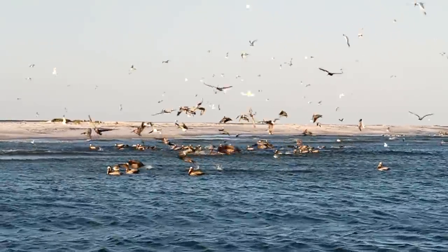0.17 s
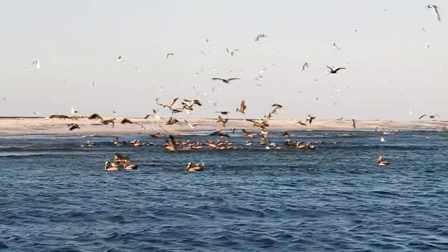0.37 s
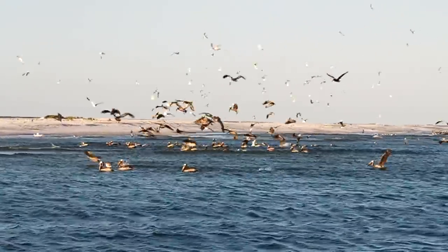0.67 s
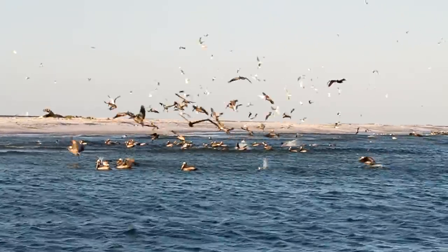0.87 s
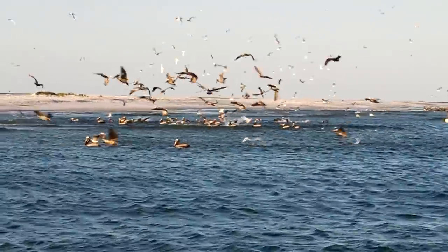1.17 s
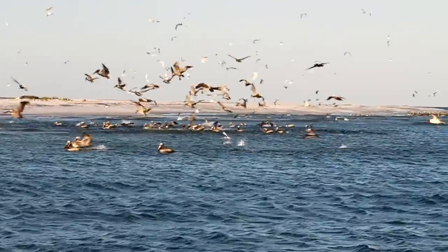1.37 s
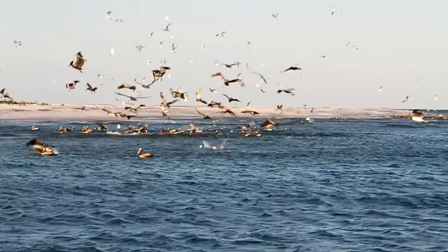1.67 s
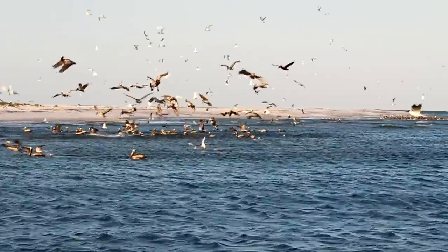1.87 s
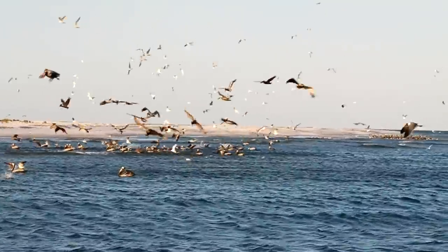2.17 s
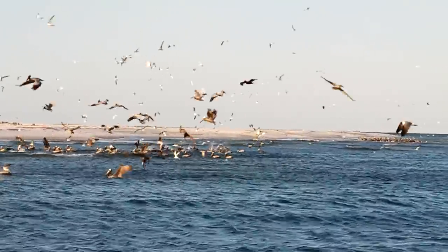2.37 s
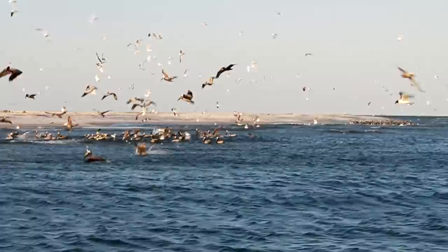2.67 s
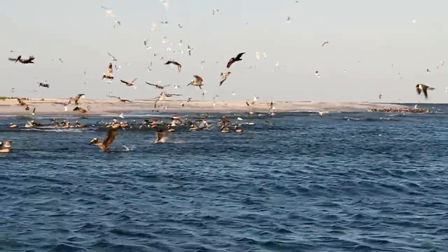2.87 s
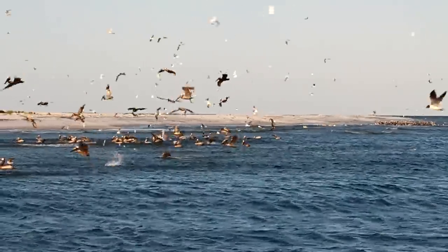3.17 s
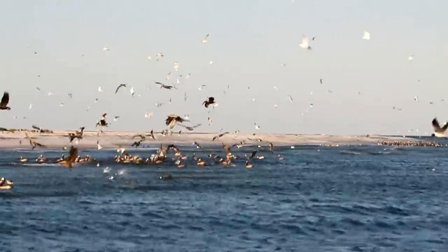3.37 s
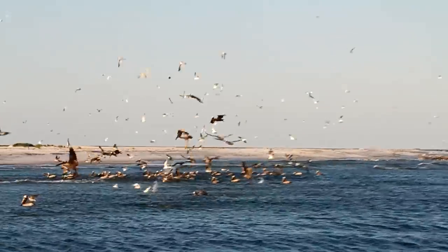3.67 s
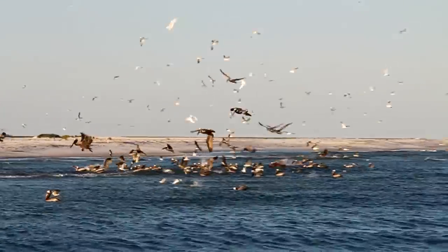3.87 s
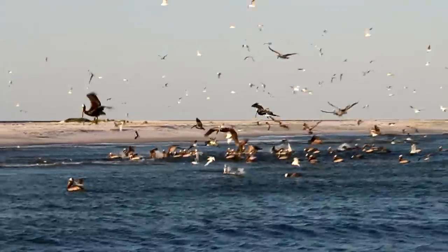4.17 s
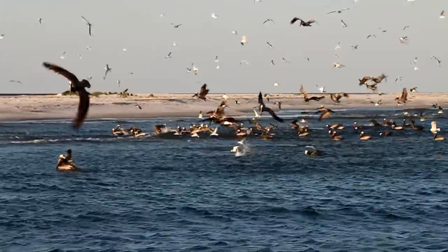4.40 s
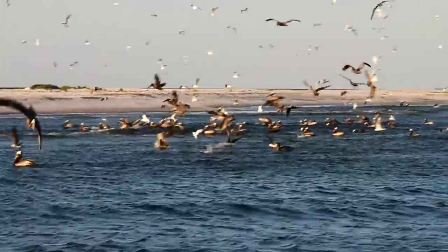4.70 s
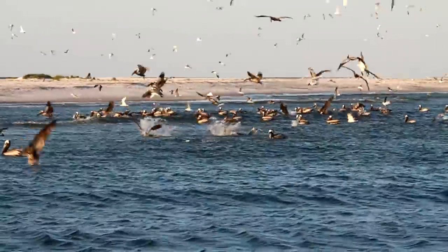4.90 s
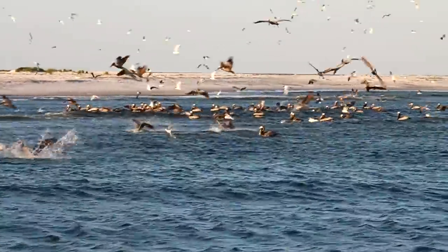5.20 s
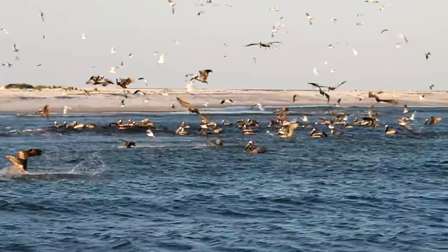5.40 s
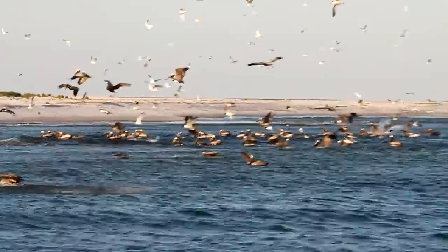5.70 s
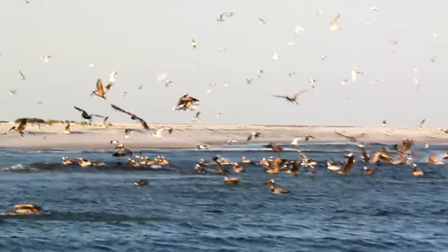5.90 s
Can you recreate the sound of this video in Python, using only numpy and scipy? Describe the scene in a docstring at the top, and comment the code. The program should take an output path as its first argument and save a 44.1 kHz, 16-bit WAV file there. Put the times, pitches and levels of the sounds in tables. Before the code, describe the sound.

A dense flock of seabirds chatters shrilly over open water while irregular wind gusts thump, crackle and rumble against an unshielded microphone.

```python
"""Gusts buffet a bare microphone in lumps while a flock of terns chatters over open water.
Each cry is a short arch of harmonics shaped by the beak; hundreds of them, with a noise blur,
make the pulsing din, and nearer birds stand out. Echoes smear the birds.
Filtered noise makes the sea, sparse pulses the wind, decaying swings its snaps and thumps;
a sine is the camera's faint high whine."""
import sys
import numpy as np
from scipy import signal
from scipy.fft import irfft
from scipy.io import wavfile
from scipy.ndimage import uniform_filter1d

SR = 44100
rng = np.random.default_rng(int(sys.argv[2]) if len(sys.argv) > 2 else 0)


def wrap_up_sound(samples):
    """Save the sound to the file named by the first command line argument, as 16-bit audio."""
    columns = np.atleast_2d(samples).T
    # keep every value between -1 and 1, then stretch to whole-number steps
    tamed = np.clip(columns, -1, 1)
    steps = np.round(tamed * 32767).astype(np.int16)
    wavfile.write(sys.argv[1], SR, steps)


def nominal_scale(level):
    """Amplitude ratio for a level in decibels (scalar or array-like)."""
    x = np.asarray(level, float) / 20
    return 10 ** x


N = 266672  # samples

# Event levels are those of each source before echoes and the recorder input.
# Wash of small waves, spectrum: (frequency [Hz], relative density [dB])
SEA_SPECTRUM = [(300, 4), (900, -2.5), (2000, 0), (5000, -13), (15000, -73)]
# Steady air between the gusts: (time [s], level [dB])
BREEZE_LEVEL = [(0.0, -29.5), (0.71, -33), (1.11, -39.5), (1.8, -30), (2.02, -32.5), (3.66, -45.5),
                (5.1, -34.5), (6.04, -35)]
# Gusts on the microphone: (start [s], length [s], level [dB])
WIND_GUSTS = [(0, 0.078, -16.5), (0.211, 0.05, -28), (0.281, 0.079, -20.5), (0.446, 0.059, -14),
              (0.508, 0.11, -28.5), (0.642, 0.1126, -24), (0.758, 0.16, -24.5), (1.045, 0.1, -21.5),
              (1.354, 0.1, -21.5), (1.533, 0.24, -24), (1.786, 0.085, -25), (1.903, 0.12, -25.5),
              (2.18, 0.2, -21), (2.53, 0.1, -29), (2.696, 0.047, -21.5), (3.231, 0.095, -20.5),
              (3.625, 0.043, -23), (4.229, 0.054, -23.5), (4.588, .12, -26), (4.855, 0.065, -28.5),
              (4.966, 0.098, -20), (5.043, 0.13, -21.5), (5.291, 0.04, -19.5), (5.835, 0.083, -20.5)]
# Single hard buffets, all equally short: (start [s], level [dB])
HARD_BUFFETS = [(.824, -20), (.892, -19), (1.088, -10.5), (1.63, -15), (1.664, -24), (1.749, -24),
                (1.842, -16), (1.926, -13), (2.201, -16.5), (2.272, -18.5), (2.34, -16.5), (2.526, -14.5),
                (2.623, -15), (2.775, -9.5), (3.282, -11.5), (4.623, -12), (5.014, -12), (5.251, -15.5),
                (5.383, -23), (5.88, -18.5)]
# Large, gentle eddies, spectrum: (frequency [Hz], relative density [dB])
SOFT_WIND_SPECTRUM = [(25, -16), (70, -2.5), (150, -2), (300, -8), (600, -20.5), (1200, -33.5), (4000, -70)]
# Smaller, sharper eddies of hard gusts, spectrum: (frequency [Hz], relative density [dB])
HARD_WIND_SPECTRUM = [(25, -52), (100, -5), (300, 1.5), (600, -5), (1100, -17.5), (2200, -30), (4500, -35),
                      (9000, -95)]
# Sharp flicks of the membrane: (start [s], level the decay starts from [dB])
MEMBRANE_SNAPS = [(0.061, -12.5), (.473, -14), (0.693, -15.5), (0.83, -23), (1.093, -13.5), (1.387, -32),
                  (1.671, -20), (1.803, -21.5), (1.851, -27), (2.337, -34), (2.534, -15.5), (2.633, -16.5),
                  (2.71, -10.5), (3.304, -6), (5.212, -18), (5.263, -17.5), (5.319, -14.5), (5.858, -21)]
# Deep single shoves of air on the membrane: (start [s], level the decay starts from [dB])
AIR_THUMPS = [(1.727, 0), (1.82, -10), (1.942, -7.5), (5.041, 4), (5.895, 2)]
# Resonance of the beak: (frequency [Hz], relative level [dB])
BEAK_RESPONSE = [(1000, -6), (1500, -11.5), (2300, 6), (2900, 0), (3900, -0.5), (5500, -2.5), (7300, -18),
                 (11000, -21.5), (15500, -29.5)]
# Bouts of chatter, when many birds set each other off: (start [s], length [s], mid level [dB])
CHATTER_BOUTS = [(-.05, 0.31, -33.5), (0.25, 0.17, -37), (0.348, 0.29, -36.5), (0.633, 0.34, -36),
                 (0.869, 0.27, -34), (1.125, 0.4, -40), (1.512, 0.32, -36.5), (1.796, 0.423, -38),
                 (2.242, 0.26, -34.5), (2.61, 0.26, -45.5), (2.947, 0.23, -38), (3.206, 0.49, -41.5),
                 (4.121, 0.38, -38), (4.498, 0.22, -35.5), (4.651, 0.25, -34.5), (4.856, 0.23, -34),
                 (5.268, 0.4, -39.5), (5.72, 0.23, -39), (5.9, 0.3, -35)]
# Nearer cries: (start [s], length [s], top pitch [Hz], level [dB])
NEAR_CRIES = [(0.041, 0.11, 3010, -36.5), (0.425, 0.065, 3370, -37), (0.496, 0.044, 3540, -37),
              (1.335, 0.045, 1633, -38.5), (1.412, 0.043, 3420, -43.5), (1.582, 0.044, 1506, -33),
              (1.685, 0.066, 1430, -37), (2.042, 0.071, 1725, -36), (2.127, 0.08, 1630, -44.5),
              (2.613, .05, 1610, -45), (2.663, .04, 3500, -51), (2.831, 0.035, 1380, -52),
              (2.913, 0.0527, 3340, -46.5), (3.071, 0.047, 1444, -34.5), (3.47, 0.023, 1500, -39),
              (3.664, 0.0445, 2880, -52), (3.712, 0.045, 2800, -45), (3.792, 0.067, 2886, -37.5),
              (3.856, 0.064, 2730, -42), (3.929, 0.062, 3050, -45), (4.1, 0.044, 3430, -52),
              (4.235, 0.064, 1755, -40), (4.314, 0.0736, 3650, -40), (4.382, 0.075, 3700, -41.5),
              (4.574, 0.062, 1555, -37.5), (4.801, 0.045, 1359, -27), (5.181, 0.053, 1613, -47),
              (5.717, 0.043, 1504, -42.5), (5.755, 0.061, 1560, -39.5), (5.82, 0.045, 1434, -39.5), ]
# Cries that climb to about their end: (start [s], length [s], top pitch [Hz], level [dB])
RISING_CRIES = [(5.958, 0.0577, 1373, -32.5), (5.997, .06, 2345, -33)]
# Rattling cries, pulsed in quick clicks:
# (start [s], length [s], top pitch [Hz], level [dB], click rate [1/s])
RATTLING_CRIES = [(0.893, 0.053, 1306, -46, 36), (2.712, .12, 1686, -43, 55), (4.025, 0.14, 1500, -46, 38),
                  (4.704, 0.086, 1420, -33.5, 61.6), (4.755, 0.07, 1170, -30.5, 77)]
# Low single whistles: (start [s], length [s], top pitch [Hz], peak level [dB])
LOW_WHISTLES = [(1.973, 0.12, 1980, -39)]


def evened(x):
    """Normalisation: scales a signal to rms 1."""
    return x / np.sqrt(np.mean(x ** 2) + 1e-20)


def read(points, hz):
    """Interpolation: reads a spectrum on a log-frequency axis."""
    f, value = np.transpose(points)
    return np.interp(np.log(hz + 1), np.log(f + 1), value)


def add(mix, s, sound):
    """Superposition: adds a sound to the mix at time s, in seconds."""
    sound = sound[max(-round(s * SR), 0):]
    part = mix[max(round(s * SR), 0):][:len(sound)]
    part += sound[:len(part)]


def coloured(x, points, size=4096):
    """Linear filtering: a symmetric impulse response of given spectrum and unit energy."""
    gain = nominal_scale(read(points, np.fft.rfftfreq(size, 1 / SR)))
    taps = np.fft.fftshift(irfft(gain)) * np.hanning(size)
    return signal.oaconvolve(x, taps / np.linalg.norm(taps), "same")


def slow(count, smooth):
    """Low-passed chance: noise averaged twice over `smooth` samples, at rms 1."""
    once = uniform_filter1d(rng.standard_normal(count), smooth)
    return evened(uniform_filter1d(once, smooth))


def swell(length, rise, fall):
    """Envelope: smooth rise, hold and smooth fall, all in seconds."""
    t = np.arange(0, length, 1 / SR)
    return np.sin(np.pi / 2 * np.clip(np.minimum(t / rise, (length - t) / fall), 0, 1)) ** 2


def sea():
    """Incoherent sum: countless small distant waves blend into slowly wavering coloured noise."""
    wash = evened(coloured(rng.standard_normal(N), SEA_SPECTRUM))
    level_db = -49.5 + 2.4 * slow(N, smooth=9000)
    return nominal_scale(level_db) * wash


def wind():
    """Turbulence: eddies press random lumps on the microphone; hard gusts carry sharper ones."""
    power = np.zeros(N)
    for s, length, db in WIND_GUSTS:
        shape = swell(length, rise=0.027, fall=0.014)  # air builds up and breaks off
        add(power, s, (nominal_scale(db) * shape) ** 2)
    for s, db in HARD_BUFFETS:
        shape = signal.windows.tukey(round(0.0226 * SR), .6)
        add(power, s, (nominal_scale(db) * shape) ** 2)
    gust = np.sqrt(power)
    breeze_db = np.interp(np.arange(N) / SR, *np.transpose(BREEZE_LEVEL))
    breeze = nominal_scale(breeze_db + 1.9 * slow(N, smooth=900))
    hard = np.clip(gust / nominal_scale(-18.0), 0, 1) ** 0.92  # 1 = fully hard
    pulses = rng.random((2, N)) < 1100 / SR  # about 1100 eddies per second
    eddies = rng.standard_normal((2, N)) * pulses
    eddies *= nominal_scale(np.array([3.12 * slow(N, smooth=220), 5.2 * slow(N, smooth=130)]))
    soft_level = breeze + gust * np.sqrt(1 - hard ** 2 * 0.93)
    soft = coloured(evened(eddies[0]) * soft_level, SOFT_WIND_SPECTRUM)
    return soft + coloured(evened(eddies[1]) * gust * hard, HARD_WIND_SPECTRUM)


def snaps():
    """Damped oscillation: a small fast eddy flicks the membrane; its swings slow as they die."""
    out, t = np.zeros(N), np.arange(500) / SR
    for (s, db), a in zip(MEMBRANE_SNAPS, rng.random(len(MEMBRANE_SNAPS))):
        hz = 500 + (1400 + 900 * a) * np.exp(-t / 0.00126)
        hz *= nominal_scale(3.4 * slow(len(t), smooth=30))  # the swings come unevenly
        swing = np.sin(2 * np.pi * np.cumsum(hz) / SR)
        decay = nominal_scale(db - 60 * t / 0.028)
        add(out, s, decay * swing * np.minimum(t / 0.00083, 1))
    return out


def thumps():
    """Heavy damping: a large eddy pushes the membrane out and back in little more than one swing."""
    out, t = np.zeros(N), np.arange(1500) / SR
    for (s, db), a in zip(AIR_THUMPS, rng.random(len(AIR_THUMPS))):
        stretched = (255 * (.8 + 0.28 * a) * t) ** 0.71  # the swing slows down
        decay = nominal_scale(db - 60 * t / 0.022)
        add(out, s, -decay * np.sin(2 * np.pi * stretched) * np.minimum(t / 0.0014, 1))
    return out


def cry(length, hz, droop, rough, clicks=0, spread_db=4.0, shrill_db=0, late=0):
    """Source and filter: an arch of harmonics shaped by the beak; rough cries jitter and flutter."""
    u = np.linspace(-1, 1, round(length * SR))
    top, flutter_hz = rng.uniform(-0.192, 0.0987), rng.uniform(40.0, 128.0)
    lean = rng.standard_normal(10)
    arch = 1 - droop * abs(u - top - late) ** 2.572
    pitch = hz * arch * (1 + 0.0495 * rough * slow(len(u), smooth=40))
    turns = np.cumsum(pitch) / SR + rng.random()
    k = np.arange(1, 11)  # harmonic numbers
    height_db = read(BEAK_RESPONSE, k * hz) + spread_db * rng.standard_normal(10) - 2.55 * (k == 1)
    # near, forceful cries shriek on their even partials
    height_db += shrill_db * (np.exp(-((k * hz - 7500) / 3500) ** 2) - 0.75 * (k % 2))
    # the beak moves: partials wax and wane apart
    height = nominal_scale(height_db[:, None] + 3.5 * np.outer(lean, u))
    partials = height * np.sin(2 * np.pi * np.outer(k, turns))
    tone = partials[k * hz < 15500].sum(0)
    throb = nominal_scale(4.9 * rough * slow(len(u), smooth=90))
    if clicks:  # the valve opens in bursts
        beat = 0.1 + np.sin(np.pi * clicks * length * (u + 1) / 2) ** 8
    else:
        depth = np.clip(0.73 * rough, 0, .9)
        beat = 1 + depth * np.sin(np.pi * flutter_hz * length * u + lean[0])
    return evened(tone * throb * beat) * signal.windows.tukey(len(u), .55)


def chatter_db():
    """Power addition: bouts add their power to a steady murmur; gives the crowd's level in dB."""
    power = np.full(N, nominal_scale(-45) ** 2)
    for s, length, db in CHATTER_BOUTS:
        shape = swell(length, rise=0.069, fall=0.07)
        sag_db = np.linspace(2, -2, len(shape))  # a bout flares, then thins out a little
        add(power, s, (shape * nominal_scale(db + sag_db)) ** 2)
    return 10 * np.log10(power)


def crowd(count=950):
    """Superposition and air absorption: a stream of cries and a far blur, brighter when loud."""
    din = np.zeros(N)
    for k, (delay, faint, long, low, harsh, high, bend, kind) in enumerate(rng.random((count, 8))):
        octave_up = (kind < .25) * (low + high > .6)  # some birds cry an octave up
        hz = (1150 + 320 * (low + high)) * (1 + octave_up)
        clicks = (kind > .8) * (30 + 40 * bend)  # some rattle
        voice = cry(.028 + .045 * long ** 2, hz, droop=0.0467 + 0.1495 * bend,
                    rough=0.089 + 0.71 * harsh ** 1.75, clicks=clicks, spread_db=5.0)
        start = (k + 10 * delay) / count * N / SR - .08
        add(din, start, nominal_scale(-12 * faint) * voice)
    blur = coloured(rng.standard_normal(N), BEAK_RESPONSE)  # the farthest birds
    din = evened(din) + nominal_scale(-8.5) * blur
    level_db = chatter_db()
    low_pass = signal.butter(4, 7000, fs=SR, output="sos")
    low = signal.sosfiltfilt(low_pass, din)
    nearness_db = 0.26 * (level_db + 35.0)  # air swallows the treble of far birds
    return nominal_scale(level_db) * evened(low + nominal_scale(nearness_db - 1.5) * (din - low))


def near_birds():
    """Harmonic sources: single cries, rattles and pure whistles that stand out of the crowd."""
    out = np.zeros(N)
    for s, length, hz, db in NEAR_CRIES:
        add(out, s, nominal_scale(db) * cry(length, hz, droop=0.12, rough=0.17, spread_db=2.0, shrill_db=3.5))
    for s, length, hz, db in RISING_CRIES:
        add(out, s, nominal_scale(db) * cry(length, hz, droop=0.014, rough=0.25, spread_db=2.5, late=1))
    for s, length, hz, db, clicks in RATTLING_CRIES:
        add(out, s, nominal_scale(db) * cry(length, hz, droop=0.039, rough=0.41, clicks=clicks,
                                  spread_db=3.5, shrill_db=5.0))
    for s, length, hz, db in LOW_WHISTLES:
        u = np.linspace(-1, 1, round(length * SR))
        pitch = hz * (1 - 0.114 * (u + 0.14) ** 2)
        whistle = np.sin(2 * np.pi * np.cumsum(pitch) / SR)
        add(out, s, nominal_scale(db) * whistle * signal.windows.tukey(len(u), .5))
    return out


def scatter(x):
    """Diffuse reflection: waves and the sandbar scatter each cry into a short smear of echoes."""
    t = np.arange(SR // 4) / SR
    sparse = rng.random(len(t)) < .03
    tail = rng.standard_normal(len(t)) * sparse * nominal_scale(-60 * t / 0.19)
    return x + nominal_scale(-12.5) * signal.oaconvolve(x, tail / np.linalg.norm(tail))[:N]


def scene():
    """Superposition: near and far birds with their echoes, plus sea and wind, in one channel."""
    birds = scatter(near_birds() + crowd())
    return (birds + sea() + wind() + snaps() + thumps())[None]


def band_limit(x):
    """A steep low-pass at the top of the band."""
    return signal.sosfilt(signal.butter(12, 16220, fs=SR, output="sos"), x)


def record(dry):
    """Saturation: the input bends over on the hardest gusts; the camera adds a faint high whine."""
    whine_db = -66 + 4.0 * slow(N, smooth=8000)
    whine = nominal_scale(whine_db) * np.sin(2 * np.pi * 15714 * np.arange(N) / SR)
    bent = 0.71 * np.tanh(dry / 0.87)
    return band_limit(bent + whine)


dry = scene()
out = record(dry)
wrap_up_sound(out)
```